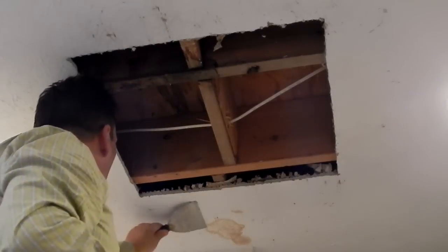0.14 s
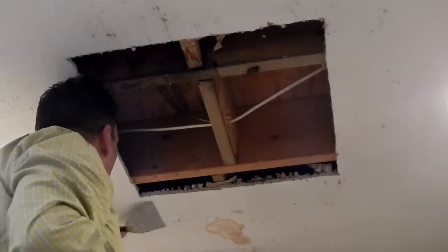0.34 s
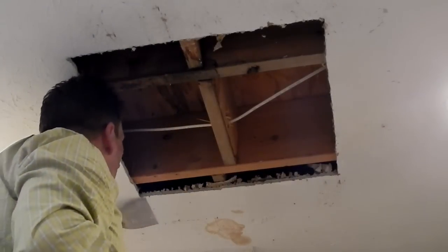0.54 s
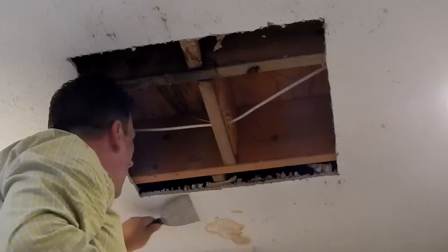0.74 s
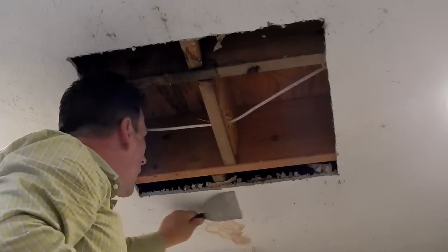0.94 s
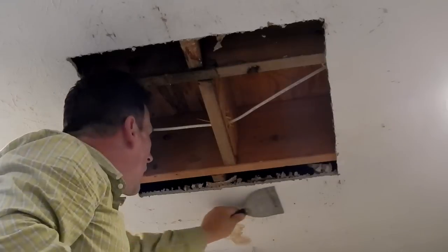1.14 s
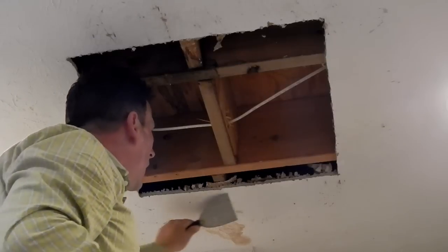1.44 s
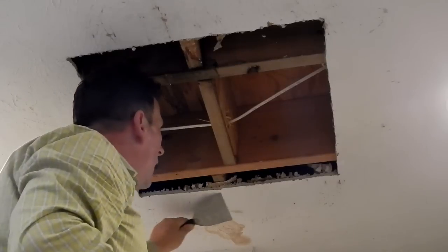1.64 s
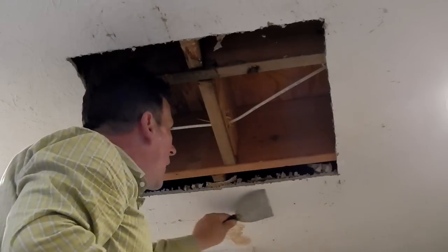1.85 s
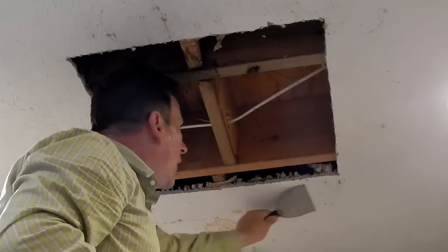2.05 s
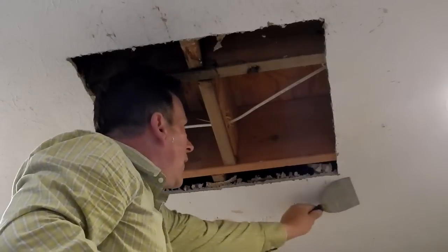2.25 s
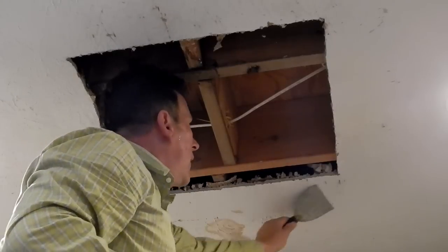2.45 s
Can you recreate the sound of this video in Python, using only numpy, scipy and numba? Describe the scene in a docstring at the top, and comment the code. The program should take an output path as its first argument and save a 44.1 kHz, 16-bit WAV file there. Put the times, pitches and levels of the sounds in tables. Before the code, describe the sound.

A steel putty knife scrapes a drywall ceiling, heard close in stereo in a bare, briefly echoing room. Gritty, ringing rasps run from 0 to 0.55 s, dip near 0.6, and return with a sharp snag at 0.98. After a lull around 1.35, a harsh, hollow scrape peaks near 1.5; another dip at 1.65, then longer strokes with board thumps at 1.8 and 1.97, a catch at 2.28, a drop near 2.42, and renewed scraping to the end over faint steady noise.

```python
"""In a bare room, a steel putty knife is pushed to and fro along a drywall ceiling.
Grit breaking under the edge is a train of random clicks; filtered, it gives rasp and hiss,
rings the flexing blade, drums the ceiling board and bursts where the edge snags.
Shoves boom in the board's lowest modes. A camera with two close microphones listens from below,
over a steady noise floor; echoes add the room."""
import sys
import numpy as np
from scipy import signal
from scipy.fft import rfft, irfft
from scipy.io import wavfile
from scipy.ndimage import uniform_filter1d
from numba import njit

SR = 44100
rng = np.random.default_rng(int(sys.argv[2]) if len(sys.argv) > 2 else 0)


def unload_audio(sound):
    """Save the sound as a 16-bit wav file, at the path given as the first command line argument."""
    columns = np.transpose(np.atleast_2d(sound))
    # keep every value between -1 and 1, then stretch to whole-number steps
    steps = np.round(np.clip(columns, -1, 1) * 32767)
    wavfile.write(sys.argv[1], SR, steps.astype(np.int16))


N = 114660

# Lowest modes of the ceiling board. Each row: pitch in Hz, width in Hz, relative level in dB when drummed.
BOARD_BASS_MODES = [(38.7, 40, -40), (67.4, 9.6, -6.5), (148, 90, 10)]


def amp(db):
    """Amplitude factor of a level in dB."""
    return 10 ** (np.asarray(db) / 20)


def unit(x):
    """Scale to an RMS of 1."""
    return x / np.sqrt(np.mean(x ** 2))


def column(table, order):
    """One column of a time table, interpolated at every sample."""
    rows = np.array(table, float)
    return np.interp(np.arange(N) / SR, rows[:, 0], rows[:, order])


def colour(x, points):
    """Shape a spectrum by (Hz, dB) points, falling steeply outside them; RMS 1."""
    hz, db = np.array(points, float).T
    f = np.fft.rfftfreq(N, 1 / SR) + 1  # +1 keeps the log finite
    corners_hz = np.r_[hz[0] / 4, hz, hz[-1] * 4]
    corners_db = np.r_[db[0] - 40, db, db[-1] - 40]
    gain_db = np.interp(np.log(f), np.log(corners_hz), corners_db)
    return unit(irfft(rfft(x) * amp(gain_db), N))


@njit
def resonate(x, hz, width):
    """State-variable band-pass whose centre and width may move."""
    y, band, low = np.empty(len(x)), 0., 0.
    for i in range(len(x)):
        g, damping = np.tan(np.pi * hz[i] / SR), width[i] / hz[i]
        v = (band + g * (x[i] - low)) / (1 + g * (g + damping))
        band, low, y[i] = 2 * v - band, low + 2 * g * v, damping * v
    return y


def twice(x, hz, width):
    """Two equal band-passes in series, a steep resonance of RMS 1; width in Hz is that of each pass."""
    hz, width = hz + np.zeros(N), width + np.zeros(N)
    ringing = resonate(resonate(x, hz, width), hz, width)
    return unit(ringing / np.sqrt(width))  # evens the power as the width moves


def modes(x, table):
    """A body ringing at fixed modes, with alternating sign."""
    total = 0
    for k, (hz, width_hz, db) in enumerate(table):
        # two passes narrow the band, so each is wider
        total = total + (-1) ** k * amp(db) * twice(x, hz, 1.5 * width_hz)
    return unit(total)


def walk(rate):
    """Slow random wander with RMS near 1, from `rate` draws per second smoothed twice."""
    k = int(SR / rate)
    steps = np.repeat(rng.standard_normal(N // k + 1), k)
    return unit(uniform_filter1d(uniform_filter1d(steps, k), k)[:N])


def grit():
    """Breaking grit: dense clicks of random sign and very uneven size, juddering in bunches."""
    clicks_per_s, mean_size_db, judder_db = 12000, 2.5, 1.46
    chance = rng.random((3, N))
    size = amp(-mean_size_db * np.log(1 - chance[1]))  # exponential spread in dB
    sign = np.sign(chance[2] - .5)
    clicks = (chance[0] < clicks_per_s / SR) * size * sign
    return unit(clicks * amp(judder_db * walk(59.66)))


def noise_floor():
    """Steady coloured noise behind everything."""
    # Each row: pitch in Hz, relative level in dB per Hz.
    floor_spectrum = [(18, -27), (30, 26), (247, -41), (629, 11), (928, -9), (1340, 18), (2310, -9),
                      (15000, -15)]
    floor_db = -53.5
    return amp(floor_db) * colour(rng.standard_normal(N), floor_spectrum)


def decaying_noise(t, t60_s):
    """A diffuse echo tail: exponentially fading noise of unit energy."""
    return unit(rng.standard_normal(len(t)) * amp(-60 * t / t60_s)) / np.sqrt(len(t))


def room(x):
    """Direct sound and echoes that change as the blade travels; the microphones differ more in the treble."""
    room_t60_s, room_db, early_t60_s = 0.34, -3.5, 0.015
    side_db, side_from_hz, side_bass_db = -1.5, 1160, -20
    new_place_s = .05  # the blade has moved far enough for new echoes
    t, hop = np.arange(int(.4 * SR)) / SR, int(new_place_s * SR)
    fade = np.sin(np.pi * np.arange(2 * hop) / (2 * hop))  # overlapping places keep equal power
    padded = np.r_[np.zeros(hop), x, np.zeros(2 * hop)]
    out = np.zeros((2, N + 6 * hop + len(t)))
    for i in range(0, N + hop, hop):
        late = np.array([decaying_noise(t, room_t60_s), decaying_noise(t, room_t60_s)])
        early = [0 * t, decaying_noise(t, early_t60_s)]  # side only
        echoes = amp(room_db) * late + early
        wet = signal.fftconvolve((padded[i:i + 2 * hop] * fade)[None], echoes, axes=1)
        out[:, i:i + wet.shape[1]] += wet
    mid, side = out[:, hop:hop + N]
    high = signal.sosfilt(signal.butter(2, side_from_hz, "high", fs=SR, output="sos"), side)
    return x + mid, amp(side_db) * high + amp(side_bass_db) * side


def booms():
    """Harder shoves make the whole board boom: its lowest modes swell and die as Gaussian-windowed sines."""
    # Each row: peak time in seconds, then level in dB (before the mix trim) of each bass mode, lowest first.
    shoves = [(0.118, -56, -57, -37.5), (0.718, -62, -47, -42), (0.781, -62, -54, -36),
              (0.879, -64, -62, -41), (1.018, -48, -50, -35), (1.251, -48, -57, -42), (1.5, -57, -56, -40),
              (1.642, -56, -50, -41.5), (1.799, -54, -54, -30), (1.881, -51, -56, -47),
              (1.974, -44, -39, -27.5), (2.129, -58, -46.5, -47), (2.32, -56, -42, -30.5),
              (2.521, -64, -48, -36)]
    top_mode_sigma_s = 0.02
    top_hz = BOARD_BASS_MODES[-1][0]
    t, out = np.arange(N) / SR, 0
    turn = 2 * np.pi * rng.random((len(shoves), len(BOARD_BASS_MODES)))
    for (peak_s, *levels), phases in zip(shoves, turn):
        for (hz, _, _), db, phase in zip(BOARD_BASS_MODES, levels, phases):
            sigma_s = top_mode_sigma_s * np.sqrt(top_hz / hz)  # lower modes last longer
            swell = np.exp(-.5 * ((t - peak_s) / sigma_s) ** 2)
            tone = np.sqrt(2) * np.sin(2 * np.pi * hz * (t - peak_s) + phase)
            out = out + amp(db) * swell * tone
    return out


def board():
    """Grit drums the board's modes; their levels and one favoured pitch move with the spot."""
    # Each row: time in seconds, bass level in dB, low middle level in dB (both before the mix trim),
    # pitch the board favours at that spot in Hz.
    spots = [(0.0, -39.5, -42, 347), (0.24, -46.5, -41.5, 373), (0.28, -42, -57, 330),
             (0.31, -50.5, -44.5, 450), (0.4, -49, -38.5, 385), (0.44, -48, -40, 660),
             (0.57, -50, -61, 390), (0.64, -50.5, -38, 443), (0.69, -35.5, -47, 296), (0.74, -49, -35, 553),
             (0.8, -45.5, -39, 365), (0.9, -37, -34, 436), (0.95, -36, -48, 316), (0.99, -46, -31, 360),
             (1.04, -37, -37, 300), (1.18, -48, -48, 407), (1.23, -37, -38, 360), (1.35, -52, -62, 390),
             (1.4, -47, -49, 630), (1.5, -53, -26.5, 417), (1.65, -57, -50.5, 546), (1.69, -50.5, -42, 392),
             (1.9, -38.5, -33.5, 414), (1.97, -37, -33.5, 317), (2.21, -42.5, -43, 366),
             (2.3, -42, -35.5, 386), (2.37, -43.5, -51, 340), (2.43, -48, -43.5, 443), (2.5, -43, -45, 615),
             (2.6, -45, -34.5, 477)]
    # Each row: pitch in Hz, width in Hz, relative level in dB.
    middle_modes = [(206.5, 8.3, -7.5), (276.4, 42, 1.5), (332, 64, 0.5), (454, 33, -1), (498, 45, -12),
                    (565, 42, 0), (640.6, 59, 4), (766, 155, 5.5), (930, 73, -10)]
    favour_db, favour_width_hz = 0, 170
    push = grit()
    bass = modes(push, BOARD_BASS_MODES)
    favoured = twice(push, column(spots, order=3), favour_width_hz)
    middle = unit(modes(push, middle_modes) + amp(favour_db) * favoured)
    return amp(column(spots, order=1)) * bass + amp(column(spots, order=2)) * middle


def catches():
    """Sudden bursts of breaking grit where the edge snags on lumps."""
    # Each row: start in seconds, level in dB before the mix trim.
    snags = [(.082, -36), (0.976, -22.5), (1.494, -46), (2.283, -30.5), (2.5, -39)]
    # Each row: pitch in Hz, relative level in dB.
    catch_spectrum = [(500, -2), (1000, 2), (2000, 4), (3500, 0.5), (5000, -1), (7000, -14.5), (11000, -39),
                      (14000, -31)]
    rise_s, decay_from_s, t60_s = 0.00079, 0.012, 0.081
    t, envelope = np.arange(N) / SR, 0
    for start_s, db in snags:
        since_s = t - start_s
        rise = np.clip(since_s / rise_s, 0, 1)
        decay = amp(-60 * np.maximum(since_s - decay_from_s, 0) / t60_s)
        envelope = envelope + amp(db) * rise * decay
    return envelope * colour(grit(), catch_spectrum)


def blade_ring(edge):
    """The blade rings in a gliding main mode and in upper modes that wander as it bends."""
    # Each row: time in seconds, main pitch in Hz, width per pass in Hz, main level in dB re stroke,
    # upper modes' level in dB re stroke.
    glide = [(0, 1540, 250, -5, -8), (.05, 1590, 250, -4, -10), (.09, 1960, 330, 3.5, -4),
             (.17, 1660, 302, 2, 0.5), (.26, 1690, 350, 0.5, -9), (.34, 1650, 500, -6.5, -23.5),
             (.44, 1760, 550, -4, -15), (.6, 1530, 350, -6, -26), (.72, 1670, 350, -10, -17),
             (.82, 1940, 450, -3.5, -12), (.95, 1530, 300, -11, -5.5), (1.07, 1420, 250, -7.5, -6.5),
             (1.17, 1890, 250, 1, -3.5), (1.25, 1836, 222, 4, -2), (1.36, 1700, 300, -4, -9),
             (1.42, 1500, 705, -6.5, -25), (1.5, 1700, 800, -5.5, -25), (1.64, 1470, 500, -0.5, -14),
             (1.8, 1660, 400, -27, -13), (1.88, 1520, 179, -4, -8.5), (1.95, 1524, 189, -12, -14.5),
             (2.08, 1545, 178, -3, -11.5), (2.14, 1510, 178, -4, -4), (2.2, 1620, 190, -4.5, 1),
             (2.25, 1630, 250, -13, -2.5), (2.31, 1606, 260, 1.5, 0.5), (2.42, 1590, 170, 5.5, -14),
             (2.48, 1390, 600, -8, -33), (2.6, 1690, 606, -11, -28)]
    # Each row: mean pitch in Hz, width per pass in Hz, relative level in dB before flicker.
    upper_modes = [(2780, 380, 0), (3650, 380, -3), (4850, 350, -8)]
    flex_share, flicker_db = .025, 3.0  # RMS wander of pitch and level
    main = twice(edge, column(glide, order=1), column(glide, order=2))
    upper = 0
    for hz, width_hz, db in upper_modes:
        level = amp(db + flicker_db * walk(9.14))
        upper = upper + level * twice(edge, hz * (1 + flex_share * walk(6)), width_hz)
    return amp(column(glide, order=3)) * main + amp(column(glide, order=4)) * unit(upper)


def knife():
    """Rasp, hiss and the blade's ring, fed by breaking grit and following the strokes."""
    # Each row: time in seconds, stroke level in dB before the mix trim, treble hiss in dB re stroke.
    strokes = [(0.0, -31.5, -13), (0.05, -29, -16), (0.07, -35, -7), (0.09, -32, -7.5), (0.17, -32, -7),
               (0.27, -42, -10), (0.31, -42, -5), (0.34, -31, -6.5), (0.44, -31, -11), (0.61, -50.5, -4.5),
               (0.67, -36.5, -10.5), (0.82, -31.5, -5.5), (0.97, -30, -12.5), (0.98, -26, -7),
               (1.02, -31.5, -13), (1.12, -33.5, -5), (1.23, -33, -4), (1.35, -49.5, -6),
               (1.39, -41.5, -2.5), (1.44, -28, -10.5), (1.49, -24.5, -7.5), (1.61, -35.5, -7.5),
               (1.63, -36.5, -32), (1.66, -44, -14.5), (1.8, -29, -9), (1.84, -30.5, -10),
               (1.89, -26, -14.5), (1.95, -27, -11), (1.98, -27, -17.5), (2.22, -29, -10),
               (2.25, -28, -12.5), (2.29, -23.5, -14.5), (2.33, -29, -21), (2.34, -35, -21),
               (2.41, -45.5, -20), (2.45, -44.5, 0), (2.47, -32, -12), (2.5, -27.5, -8.5), (2.6, -30, -14)]
    # Each row: pitch in Hz, relative level in dB.
    rasp_spectrum = [(600, -6), (1000, 5), (1500, 5.5), (2200, 2), (3000, -0.5), (4000, -9.5), (5000, -15),
                     (6500, -15)]
    # Each row: pitch in Hz, relative level in dB.
    hiss_spectrum = [(4000, -7), (5500, -9.5), (7000, -10), (9000, -5), (11000, -7), (13000, -13.5),
                     (15500, -21.5)]
    ring = blade_ring(grit())
    edge = grit()
    rasp = amp(-3.0) * colour(edge, rasp_spectrum)
    hiss = amp(column(strokes, order=2)) * colour(edge, hiss_spectrum)
    return amp(column(strokes, order=1)) * (rasp + ring + hiss)


def scene():
    """Mix the sources, add room and floor, and lean the treble to the left."""
    left_over_right_db, lean_from_hz = .8, 500
    mix_trim_db = -2.0
    mid, side = room(amp(mix_trim_db) * (knife() + board() + booms() + catches()))
    mid = mid + noise_floor()
    treble = signal.sosfilt(signal.butter(1, lean_from_hz, "high", fs=SR, output="sos"), mid)
    side = side + np.tanh(left_over_right_db * np.log(10) / 40) * treble  # tanh turns the dB ratio into a side share
    return np.array([mid + side, mid - side])


def record(dry):
    """The camera notches out narrow bands and cuts the top."""
    # Each entry: notch centre in Hz.
    notches = [2500, 5000, 7500, 10000]
    notch_width_hz, notch_depth, top_hz = 75, .8, 15730  # depth is the share removed at the centre
    for hz in notches:
        dry = dry - notch_depth * signal.lfilter(*signal.iirpeak(hz, hz / notch_width_hz, SR), dry)
    return signal.sosfilt(signal.ellip(16, .2, 80, top_hz, fs=SR, output="sos"), dry)


dry = scene()
out = record(dry)
unload_audio(out)
```